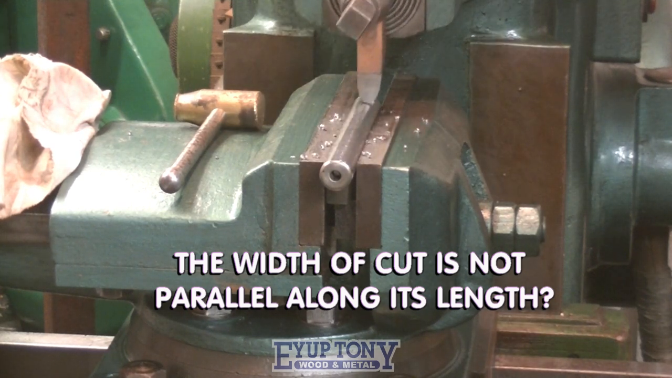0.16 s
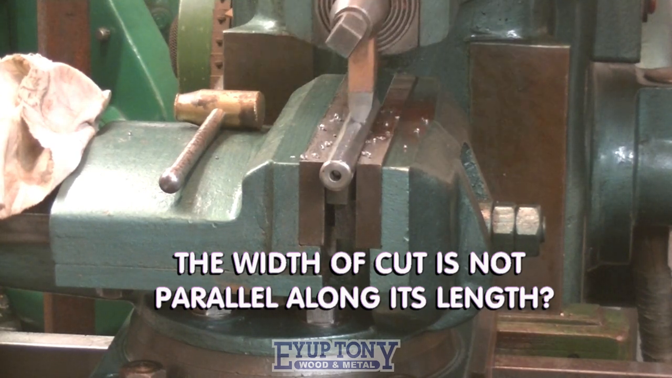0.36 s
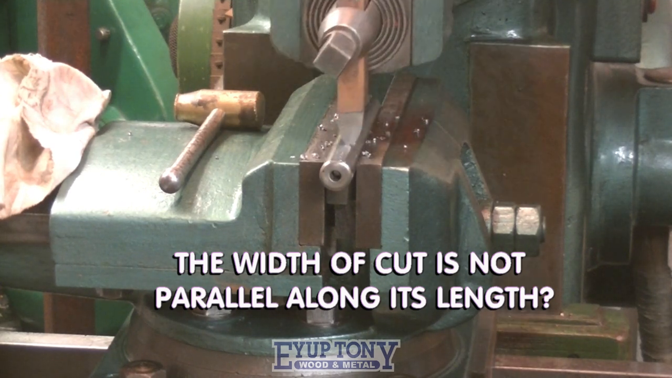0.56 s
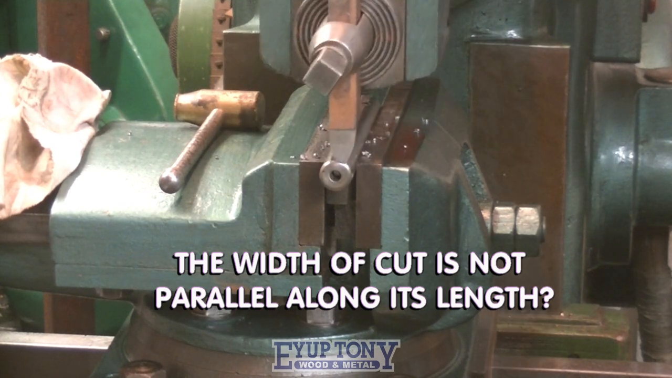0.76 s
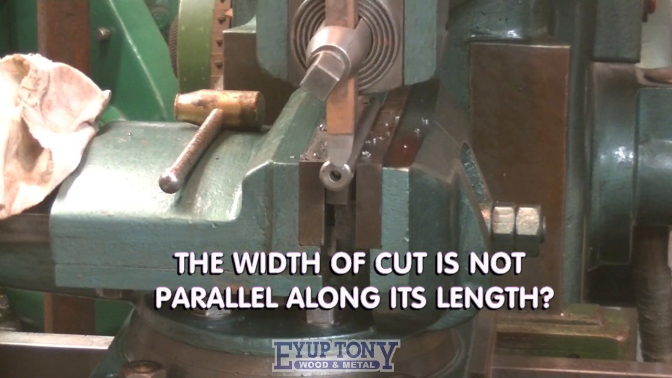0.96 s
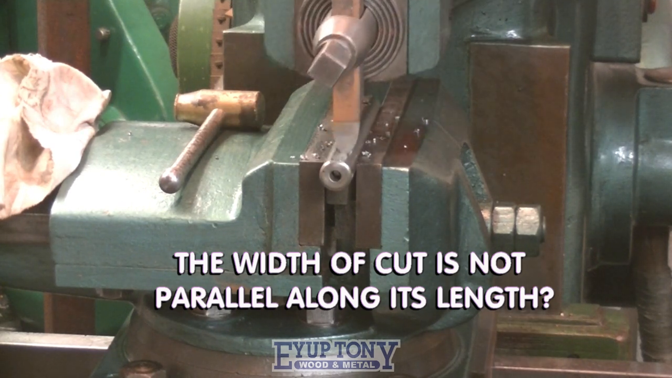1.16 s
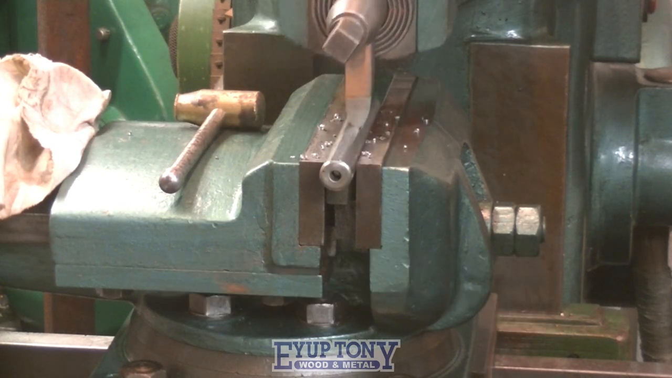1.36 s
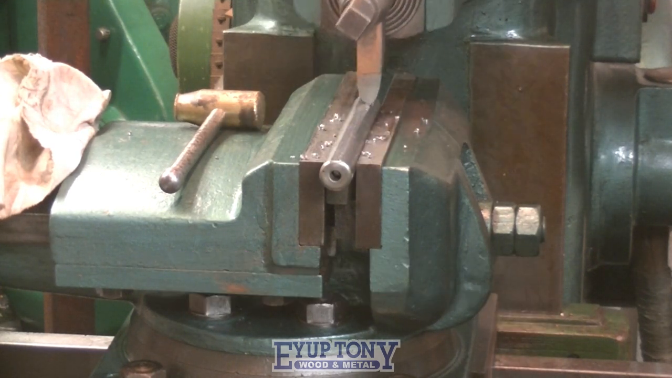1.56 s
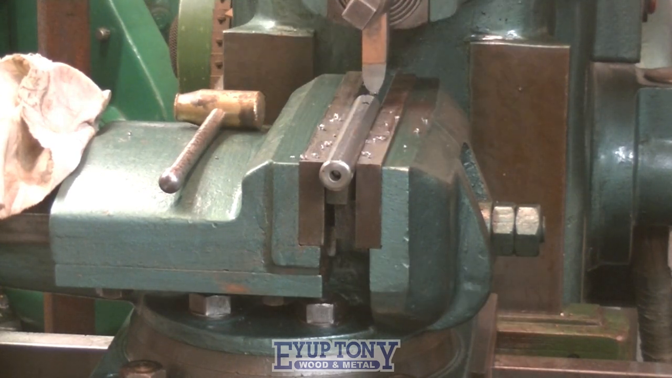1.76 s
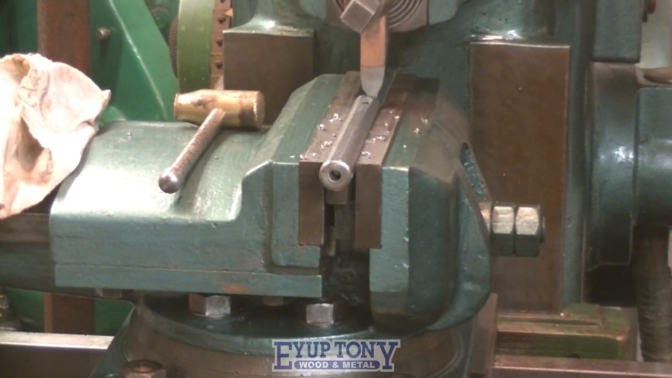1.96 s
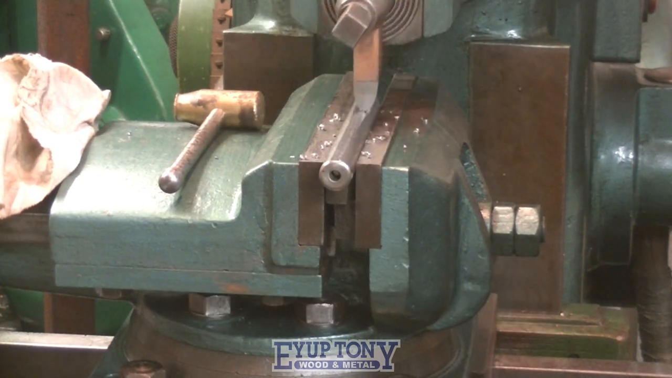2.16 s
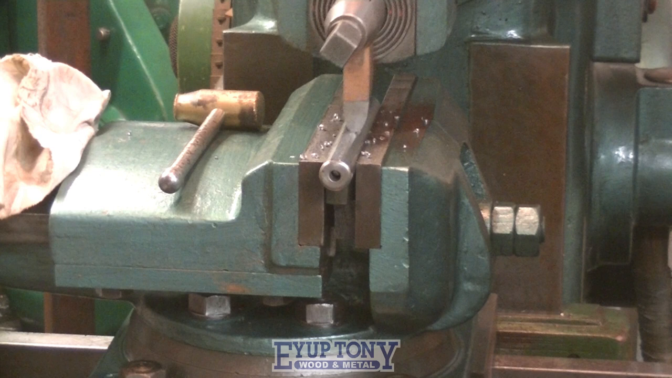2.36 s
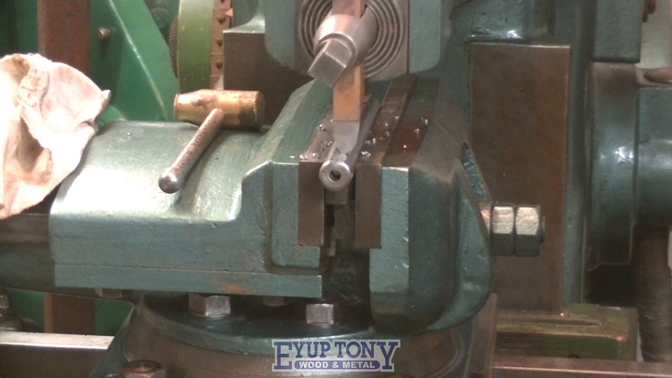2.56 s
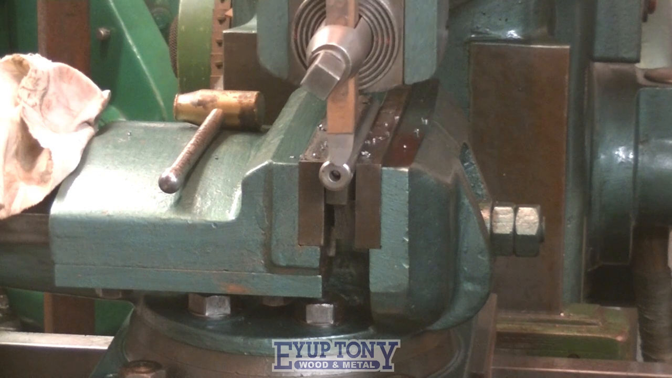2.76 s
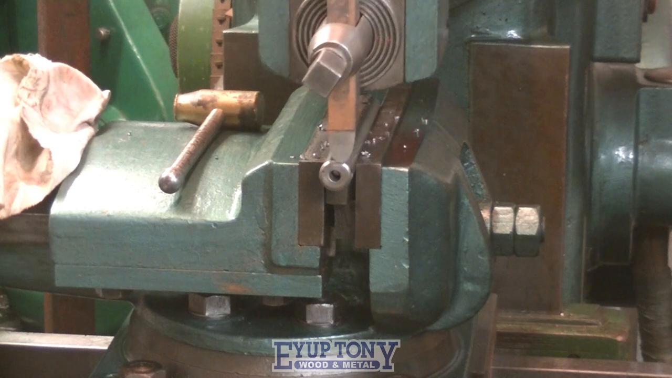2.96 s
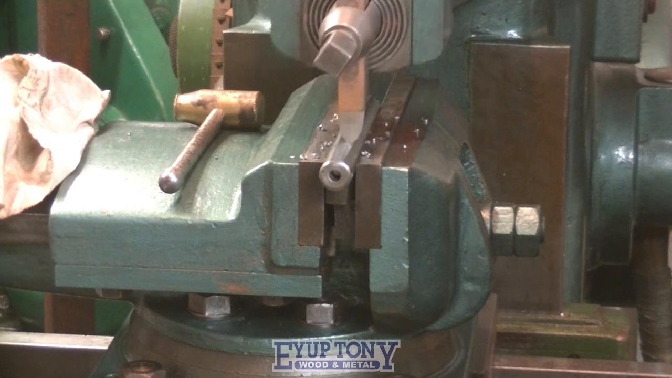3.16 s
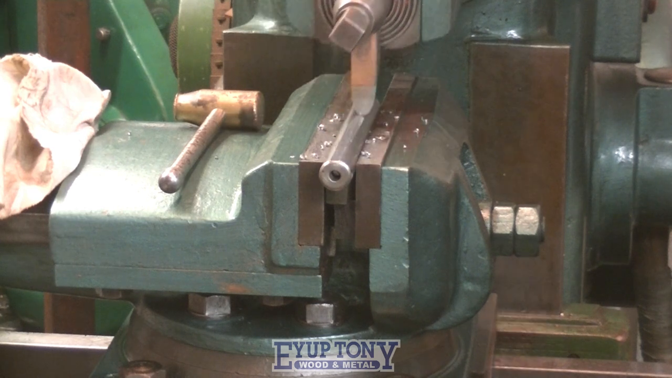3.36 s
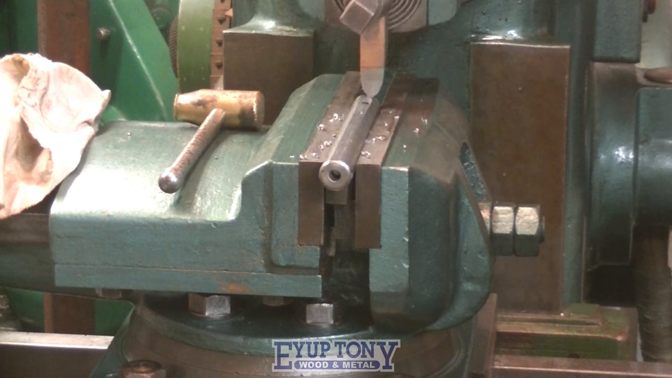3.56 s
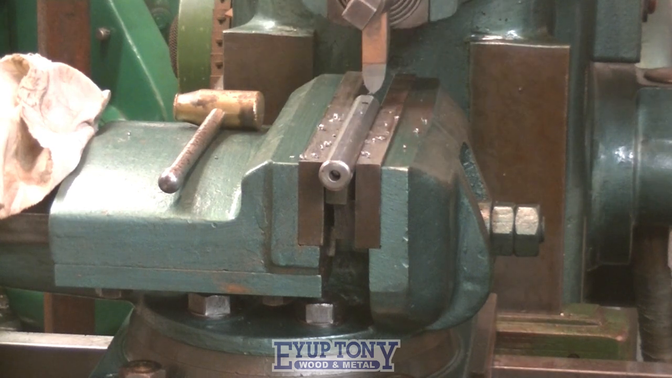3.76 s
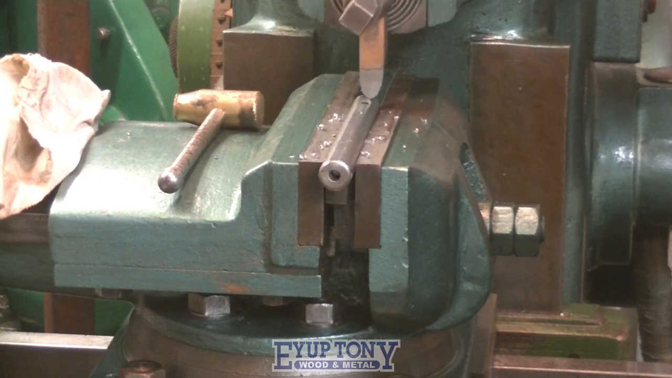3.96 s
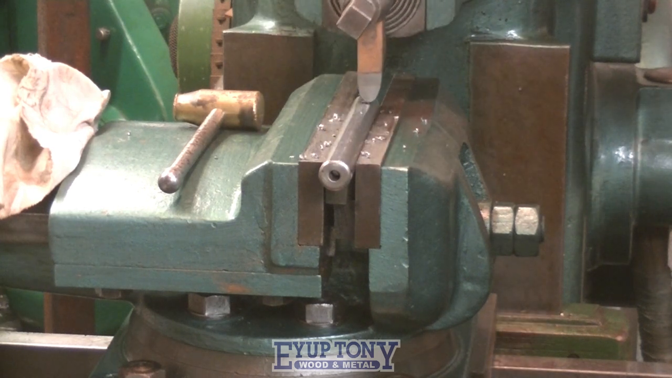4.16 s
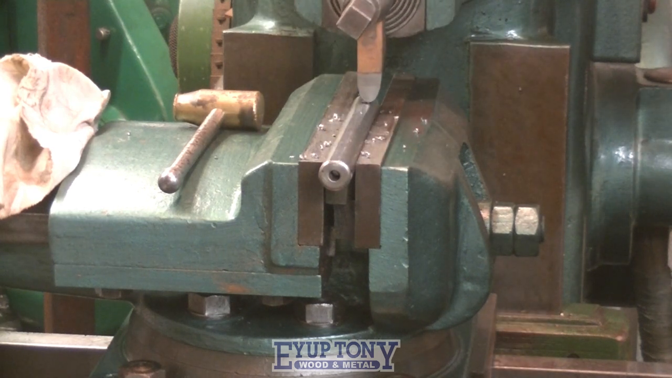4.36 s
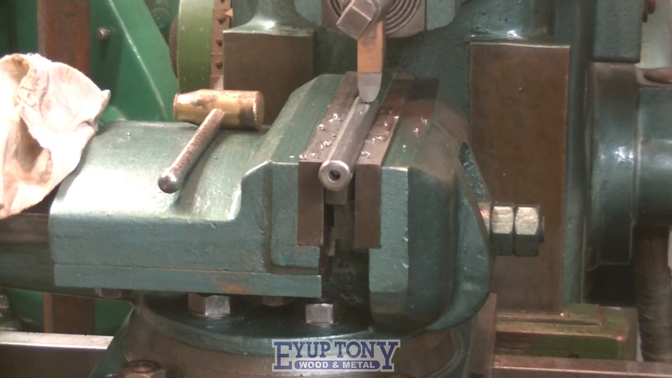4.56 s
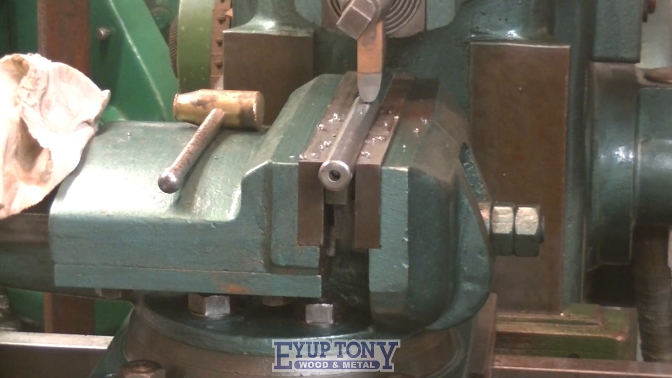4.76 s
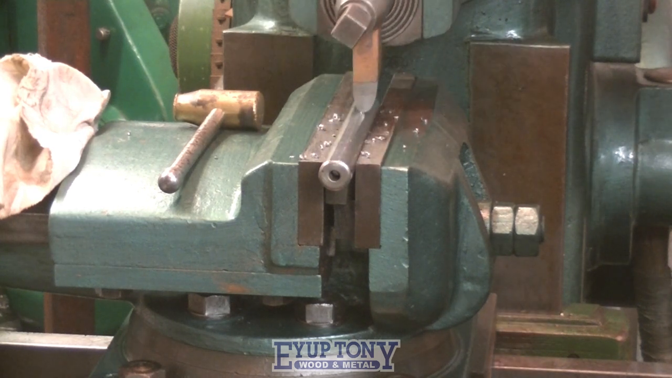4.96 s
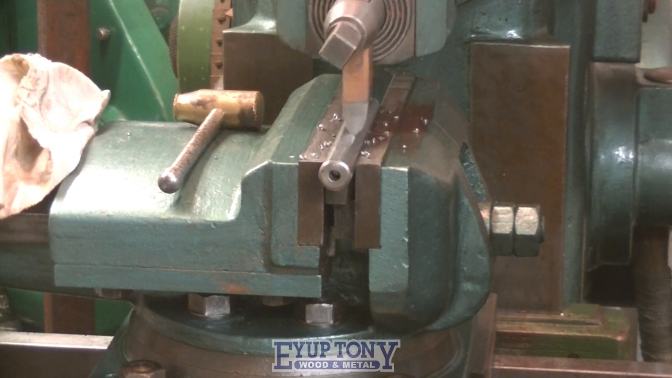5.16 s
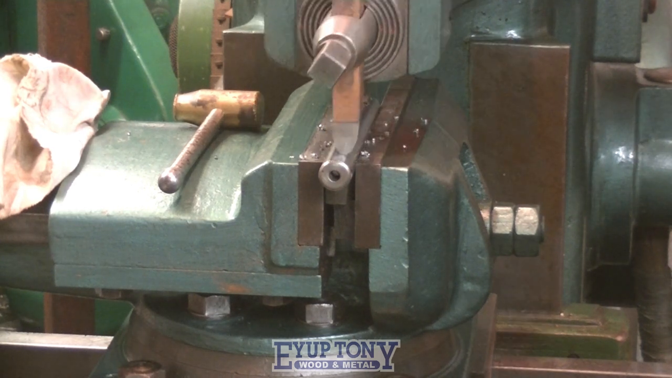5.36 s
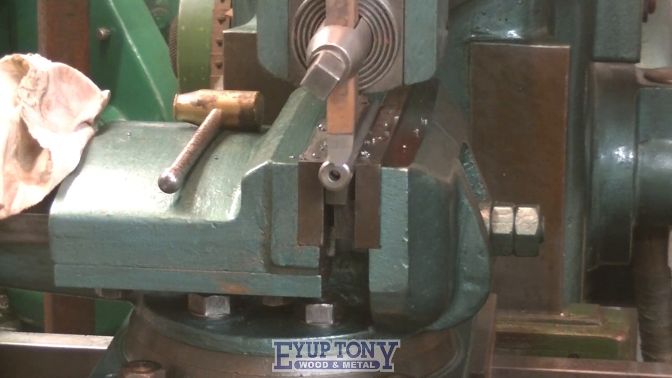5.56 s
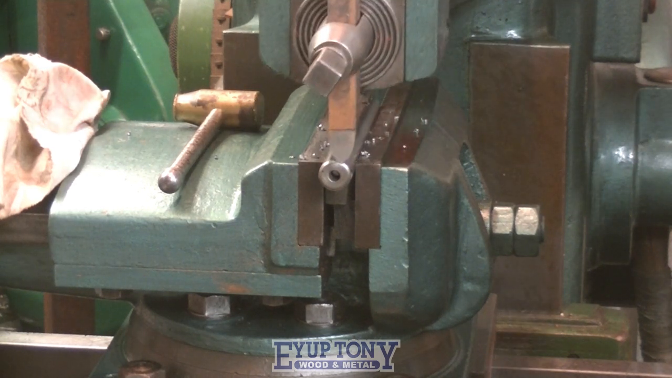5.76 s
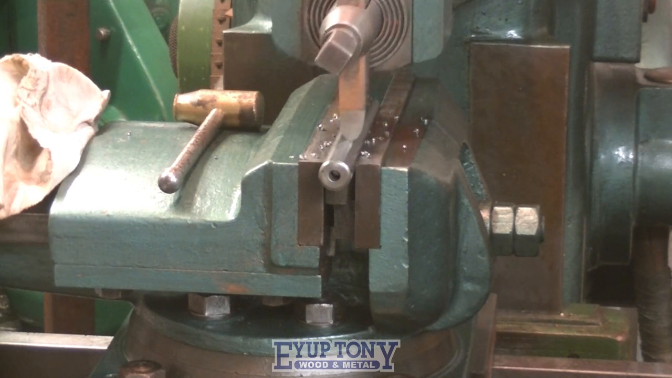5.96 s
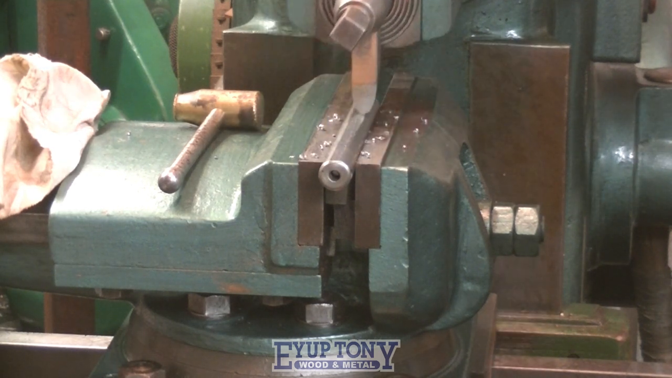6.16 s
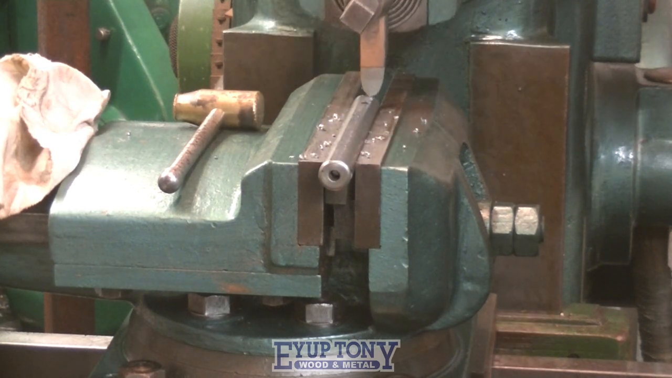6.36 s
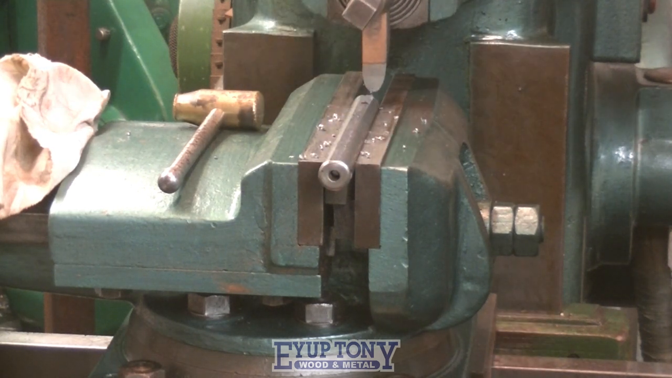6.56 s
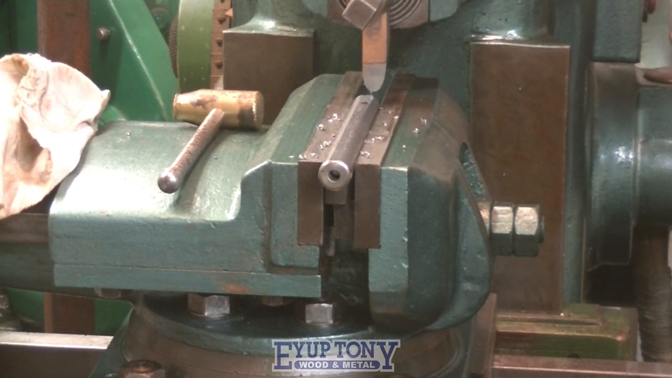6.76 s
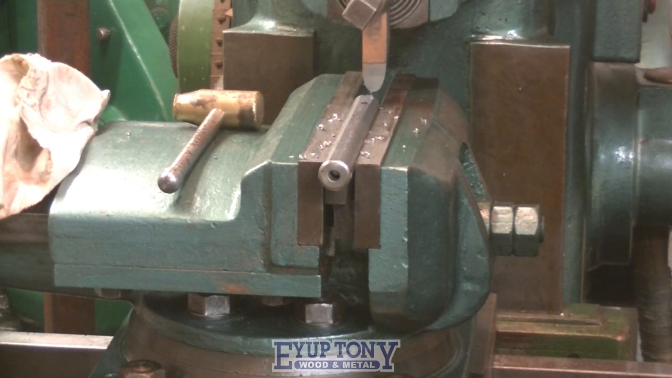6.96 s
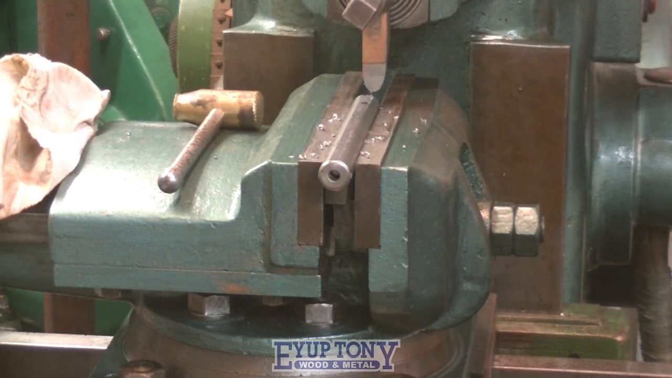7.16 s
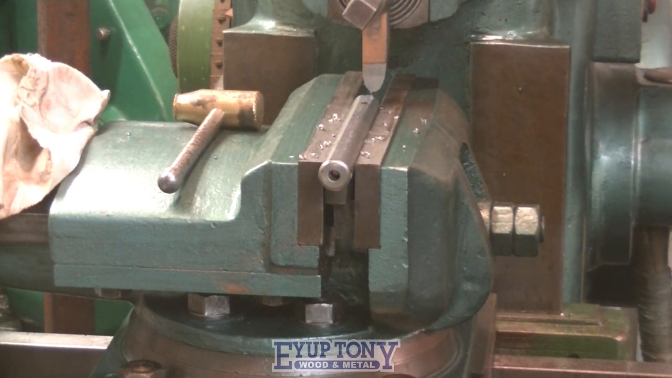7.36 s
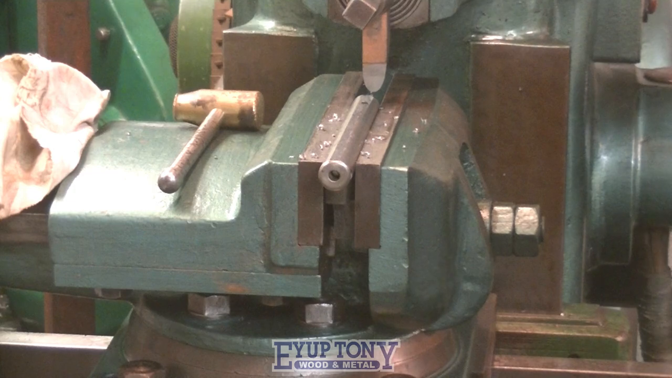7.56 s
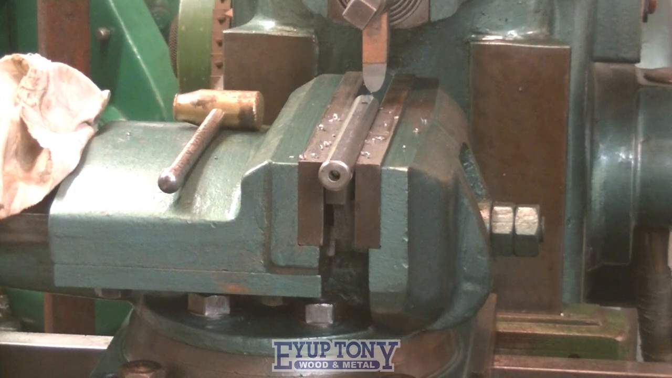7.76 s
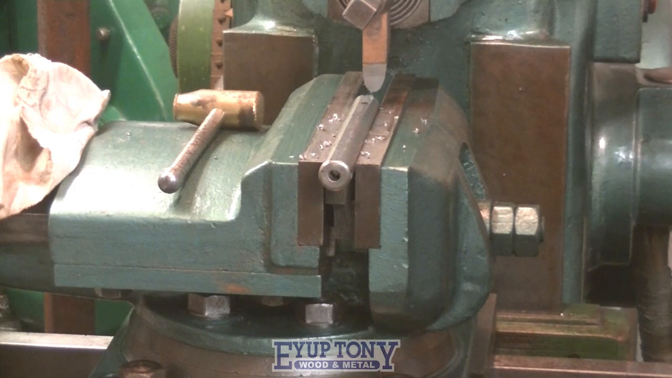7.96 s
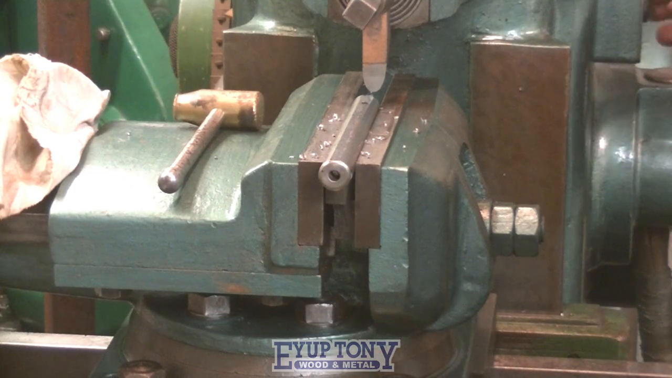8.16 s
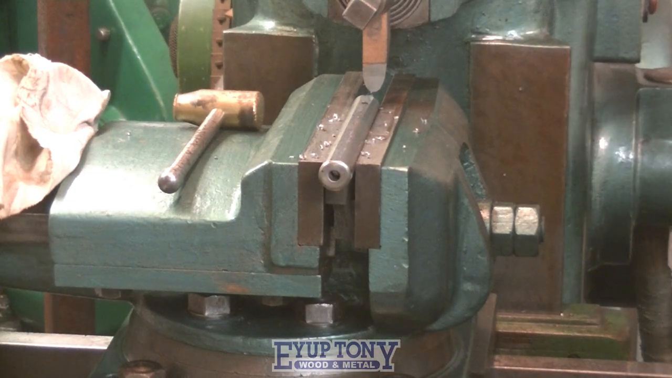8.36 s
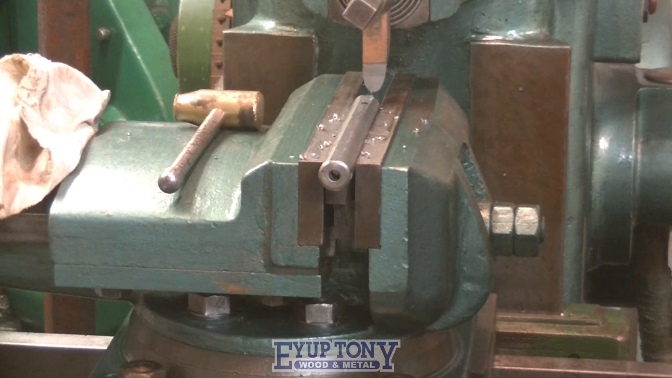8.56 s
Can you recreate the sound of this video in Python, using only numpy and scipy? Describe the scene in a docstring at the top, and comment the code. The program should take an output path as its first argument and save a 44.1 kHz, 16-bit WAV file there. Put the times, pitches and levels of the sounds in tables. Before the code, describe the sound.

Rough, grinding gear noise fills a close stereo pickup in a small, short-ringing workshop. Thin shaft chirps flutter over it and the tool box snaps sharply about every two seconds. The gears knock to a halt, the motor whirrs and hums, then one more stroke growls and snaps. After more dull clunks only the motor remains, until a switch clacks and the hum vanishes at once.

```python
"""Gears growl first, close to the microphone pair: a metal shaper strokes over steel in a small workshop.
The growl, teeth knocking in an iron casting, swells with each stroke; a shaft squeals in short chirps once a
turn, and the tool box snaps as noise bursts ringing through steel. The drive is let out, taken up for one more
stroke and let out again. The motor, filtered noise for the whirr and sines for the hum, runs on alone until
it is switched off with a clack: the hum goes at once, the whirr sinks slowly."""
import sys
import numpy as np
from scipy import signal
from scipy.fft import rfft, irfft, next_fast_len
from scipy.io import wavfile
from scipy.ndimage import map_coordinates

SR = 44100
rng = np.random.default_rng(int(sys.argv[2]) if len(sys.argv) > 2 else 0)


def master_out(mix):
    """Clip the mix to full scale and print it as 16-bit PCM to the path in sys.argv[1]."""
    frames = np.transpose(np.atleast_2d(mix))
    ceiling = np.clip(frames, -1, 1)
    pcm = np.round(ceiling * 32767).astype(np.int16)
    wavfile.write(sys.argv[1], SR, pcm)


N = 378819
TIME = np.arange(N) / SR
LEAN_LEFT = [[1.], [-1.]]  # dB for left and right: a source a little to the left
POWER_OFF_S = 8.12


def amp(db):
    """Decibels to gain."""
    return 10 ** (np.asarray(db) / 20)


def evened(x):
    """Scales to rms 1."""
    return x / np.sqrt(np.mean(x ** 2) + 1e-20)


def unit_energy(x):
    """Scales to a sum of squares of 1."""
    return x / np.linalg.norm(x)


def read(points, hz):
    """Reads a spectrum on a log-frequency axis."""
    f, value = np.transpose(points)
    return np.interp(np.log(hz + 1), np.log(f + 1), value)


def add(mix, s, sound):
    """Mixes a sound in at a time."""
    part = mix[..., max(round(s * SR), 0):][..., :sound.shape[-1]]
    part += sound[..., :part.shape[-1]]


def since(s):
    """Seconds since a moment, zero before it."""
    return np.maximum(TIME - s, 0)


def gate(start_s, end_s, edge_s):
    """Opens from the start and is shut by the end, with sloping edges."""
    return np.clip(np.minimum(TIME - start_s, end_s - TIME) / edge_s, 0, 1)


def drift(per_s, count=600):
    """Smooth random wandering of rms 1, through so many random points a second."""
    points = rng.standard_normal(count)
    slow = evened(map_coordinates(points, [TIME[::64] * per_s], mode="wrap"))
    return slow.repeat(64)[:N]


def band(x, lo_hz, hi_hz, order=2):
    """Band-pass."""
    edges = [lo_hz, min(hi_hz, SR / 2 - 1)]
    return signal.sosfilt(signal.butter(order, edges, "band", fs=SR, output="sos"), x)


def smooth_pass(x, hz, side):
    """Low-pass or high-pass without delay."""
    return signal.sosfiltfilt(signal.butter(2, hz, side, fs=SR, output="sos"), x)


def singing(hz, width_hz):
    """A narrow, rubbed resonance: band-passed noise of rms 1."""
    return evened(band(rng.standard_normal(N), hz - width_hz / 2, hz + width_hz / 2))


def burst(length_s, size=6000):
    """A contact of unit energy: fine chatter that dies away."""
    return unit_energy(rng.standard_normal(size) * np.exp(-TIME[:size] / length_s))


def body(x, colour, resonances=(), size=8192):
    """Causal filter of unit energy: a broad colour with resonances standing on it."""
    hz = abs(np.fft.fftfreq(size, 1 / SR))
    peaks_db = sum(g / (1 + (2 * (hz - f) / w) ** 2) for f, w, g in resonances)
    log_gain = np.log(amp(read(colour, hz) + peaks_db))
    # minimum phase: the ring starts at once and only dies away
    ring = np.fft.ifft(np.exp(np.conj(signal.hilbert(log_gain)))).real[:size // 2]
    return signal.oaconvolve(np.atleast_2d(x), unit_energy(ring)[None], axes=1)[:, :x.shape[-1]]


def struck(blows, modes, rise_s=.002, size=16000):
    """Blows (time [s], level [dB]) set the decaying sine modes of one object ringing."""
    t, out = TIME[:size], np.zeros(N)
    ring = sum(amp(db - 60 * t / t60) * np.sin(2 * np.pi * (hz * t + rng.random()))
               for hz, db, t60 in modes)
    for s, db in blows:
        add(out, s, amp(db) * ring * (1 - np.exp(-t / rise_s)))
    return out


# likeness of the two microphones: (frequency [Hz], left-right correlation [-1 to 1])
PAIR_LIKENESS = [(40, 0.3), (120, 0.42), (300, 0.97), (600, 0.96), (1200, .95), (2200, 0.9), (4000, 0.62),
                 (8000, 0.3), (14000, 0.33)]
# lean of the microphone pair: (frequency [Hz], left minus right [dB])
PAIR_BALANCE = [(60, -1.5), (250, 1.5), (500, 3.5), (1000, 2.5), (2000, 1.5), (4000, -0.1), (12000, 2.5)]


def ports(pair):
    """Two unrelated signals become a microphone pair, its likeness and balance varying with pitch."""
    size = next_fast_len(pair.shape[1])
    (a, b), hz = rfft(pair, size), np.fft.rfftfreq(size, 1 / SR)
    same = np.clip(read(PAIR_LIKENESS, hz), -1, 1)
    mid = a * np.sqrt((1 + same) / 2)
    side = b * np.sqrt((1 - same) / 2)
    lean = amp(read(PAIR_BALANCE, hz) / 2)
    return irfft(np.array([(mid + side) * lean, (mid - side) / lean]), size)[:, :pair.shape[1]]


# how long the workshop rings: (frequency [Hz], 60 dB decay time [s])
ROOM_DECAY = [(100, 0.1), (1000, 0.22), (4000, 0.22), (8000, 0.19), (15000, 0.12)]


def workshop(x, direct_db, wet_db, gap_s=.002):
    """Direct sound, then dense reflections from close walls and machines, each pitch dying at its own rate."""
    size = SR // 2
    taps = rng.standard_normal((2, size)) * (rng.random((2, size)) < 5000 / SR)  # 5000 a second
    taps *= TIME[:size] > gap_s
    hz, t, z = signal.stft(taps, SR, nperseg=256)
    decay = amp(-60 * t / read(ROOM_DECAY, hz)[:, None])
    tail = ports(signal.istft(z * decay, SR, nperseg=256)[1])
    tail = unit_energy(tail) * np.sqrt(2)  # unit energy per microphone
    wet = signal.oaconvolve(x[None], tail, axes=1)[:, :N]
    return amp(direct_db) * x + amp(wet_db) * wet


# colour of belt and bearing whirr: (frequency [Hz], relative density [dB per Hz])
WHIRR_COLOUR = [(30, -33), (60, -30.5), (135, -16), (180, -12), (235, -11.5), (300, -3.5), (480, 0),
                (900, 0), (1500, -3), (2500, -4.5), (3500, -11.5), (5500, -17.5), (9000, -26.5),
                (15000, -42)]
# resonances of the belt guard and pulleys: (frequency [Hz], width [Hz], height [dB])
GUARD_RESONANCES = [(190, 30, 5.5), (364, 36, 6.5), (740, 120, -2), (920, 120, 2), (1750, 60, 2),
                    (2425, 46, 5), (2924, 98, 7.5)]
LULL_S, LULL_WIDTH_S, LULL_WHIRR_DB = 7.24, .14, -4.8  # the idling motor goes briefly quieter
COAST_FALL_DB_PER_S = 8  # after the current is cut
# without current the motor's magnetic rumble, the low part of the whirr, drops
MAGNETIC_RUMBLE_DB, MAGNETIC_RUMBLE_S, MAGNETIC_RUMBLE_BELOW_HZ = -3.8, .1, 950
# the bearings sing on steadily: (frequency [Hz], width [Hz], level [dB])
BEARING_TONES = [(430, 19, -77), (1123, 160, -65.5), (1917, 150, -76.5), (2370, 400, -74.5),
                 (4260, 570, -74)]


def motor_whirr(whirr_db=-57.9, flutter_db=1.1):
    """Noise of belt, bearings and magnetic rumble, coloured by the guard, sinks once the current is cut."""
    off_s, lull = since(POWER_OFF_S), np.exp(-((TIME - LULL_S) / LULL_WIDTH_S) ** 2)
    whirr = evened(body(rng.standard_normal((2, N)), WHIRR_COLOUR, GUARD_RESONANCES))
    whirr = whirr * amp(whirr_db + LULL_WHIRR_DB * lull - COAST_FALL_DB_PER_S * off_s)
    rumble = smooth_pass(whirr, MAGNETIC_RUMBLE_BELOW_HZ, "low")
    whirr = whirr + rumble * (amp(MAGNETIC_RUMBLE_DB * np.minimum(off_s / MAGNETIC_RUMBLE_S, 1)) - 1)
    bearings = sum(amp(db) * np.array([singing(hz, width), singing(hz, width)])
                   for hz, width, db in BEARING_TONES)
    return ports(whirr + bearings) * amp(flutter_db * drift(25))


# motor hum: magnetic tones, with rotor tones near 377, 425 and 468 Hz: (frequency [Hz], level [dB])
HUM_LINES = [(299.5, -80), (376.8, -73), (424.5, -76), (468.3, -73), (549.1, -76), (598.5, -69.5),
             (699.8, -71), (796.7, -74.5), (1001, -74), (1098, -72)]
WHINE_HZ, DRONE_HZ = 899.2, 500
# slot whine: (time [s], level [dB])
WHINE_CURVE = [(4.2, -60.5), (6.9, -59.8), (7.12, -62.5), (7.27, -73), (7.45, -62), (8.1, -61.8)]
# drone, loudest just before the current is cut: (time [s], level [dB])
DRONE_CURVE = [(4.4, -70), (6.75, -69.5), (7.05, -66.5), (7.3, -66), (7.5, -63.8), (8.1, -62.5)]
MAINS_HZ, MAINS_DB = 100, -91  # a faint tone that stays to the end
HUM_FALL_DB_PER_S = 130  # after the current is cut


def motor_hum():
    """Magnetic pull and the turning rotor hum in slightly wavering tones, which collapse with the current."""
    def line(hz, db):
        level = np.sqrt(2) * amp(db + 1.1 * drift(12) + 1.5 * drift(2.5))
        return level * np.sin(2 * np.pi * hz * TIME + .25 * drift(14))
    hum = sum(line(hz, db) for hz, db in HUM_LINES)
    whine = line(WHINE_HZ, np.interp(TIME, *np.transpose(WHINE_CURVE)))
    drone = line(DRONE_HZ, np.interp(TIME, *np.transpose(DRONE_CURVE)))
    fall = amp(-HUM_FALL_DB_PER_S * since(POWER_OFF_S))
    return (hum + whine + drone) * fall + line(MAINS_HZ, MAINS_DB)


CLUTCH_HZ, CLUTCH_RISE_S, CLUTCH_FADE_DB_PER_S = 2577, .12, 10


def clutch(width_hz=70, flutter_db=2.):
    """The freed plate rubs and rings, fading, until it is taken up again or the current is cut."""
    ends = [run[0] for run in RAM_RUNS[1:]] + [POWER_OFF_S]
    level = np.zeros(N)
    for (_, _, still_s, _, _, db), end_s in zip(RAM_RUNS, ends):
        free = gate(still_s, end_s + CLUTCH_RISE_S, CLUTCH_RISE_S)
        level += free * amp(db - CLUTCH_FADE_DB_PER_S * since(still_s))
    return singing(CLUTCH_HZ, width_hz) * level * amp(flutter_db * drift(16))


# small chips landing on the steel: (time [s], level [dB])
CHIP_PINGS = [(1.482, -34), (3.3855, -35)]


def chips(lo_hz=11500, hi_hz=15600, length_s=.003):
    """A flying chip lands with a tiny, glassy tick: a short burst in the top treble."""
    out = np.zeros(N)
    for s, db in CHIP_PINGS:
        add(out, s, amp(db) * burst(length_s))
    return band(out, lo_hz, hi_hz)


# slack parts: (time [s], relative level [dB], length [s], centre [Hz], width [octaves])
SLACK_KNOCKS = [(3.695, -20.5, .01, 2620, .55), (3.797, -10.5, .04, 1160, .16),
                (3.825, -21, .015, 1650, .6), (3.879, -12.5, .014, 1800, .7), (3.958, -23, .014, 420, .8),
                (6.428, -15, .025, 1300, 1.2), (6.442, -20, .012, 390, .8), (6.467, -21.5, .016, 3580, .7),
                (6.539, -16, .0083, 1100, 1.6), (6.605, -21, .018, 1700, 1.2),
                (6.75, -27.5, .035, 1700, .6)]


def knocks():
    """Slack parts thud dully, each a noise burst in its own range."""
    out = np.zeros(N)
    for s, db, length_s, hz, octaves in SLACK_KNOCKS:
        half_width = 2 ** (octaves / 2)
        thud = band(burst(length_s), hz / half_width, hz * half_width, order=4)
        add(out, s, amp(db) * unit_energy(thud))
    return out


# colour of the switch contacts: (frequency [Hz], relative level [dB])
CONTACT_COLOUR = [(100, -22), (300, -6), (550, 5.5), (1100, -4), (1700, -1), (2400, 0), (2950, 0),
                  (3450, 3.5), (4300, -9), (5400, -3.5), (8000, -3), (10000, -13), (12500, -11),
                  (16000, -22)]
# the stop switch, button, trip, contactor falling open:
# (time [s], relative click level [dB], contact time [s], relative box thud [dB])
SWITCH_CONTACTS = [(8.091, -23, .0089, -40), (8.1228, -18, .002, -26), (8.1258, -6.8, .0015, -15),
                   (8.132, -13, .004, -24), (8.14, -19, .0073, -30), (8.1535, -21, .005, -22),
                   (8.164, -23, .0027, 0)]


def switch(level_db=-7.7):
    """The contacts of the stop switch click in a quick rattle."""
    clicks = np.zeros(N)
    for s, click_db, contact_s, _ in SWITCH_CONTACTS:
        add(clicks, s, amp(click_db) * burst(contact_s))
    return amp(level_db) * body(clicks, CONTACT_COLOUR)[0]


# what the hollow switch box rings with: (frequency [Hz], relative level [dB], 60 dB decay time [s])
BOX_RING = [(180, -62, .2), (280, -52, .08), (345, -46.5, .32), (450, -49, .06), (560, -45, .1),
            (755, -43, .12), (825, -43, .1), (1155, -53, .1), (1700, -56, .07), (2005, -52, .14),
            (2350, -56, .1)]


def switch_box():
    """The hollow box booms in its own modes under every contact of the switch."""
    return struck([(s, db) for s, _, _, db in SWITCH_CONTACTS], BOX_RING)


# the gears clunk across their backlash as the load comes off: (time [s], relative level [dB])
GEAR_CLUNKS = [(3.812, -3), (3.836, -1), (3.947, -3), (3.975, -9), (4.012, -10), (4.063, -11), (4.089, -4),
               (6.472, -6), (6.539, 3.5), (6.565, -8), (6.601, -5), (6.631, -7), (6.665, -11)]
# what a gear wheel rings with: (frequency [Hz], relative level [dB], 60 dB decay time [s])
WHEEL_RING = [(390, -51, .1), (505, -50, .09), (590, -50, .09), (680, -44, .08), (712, -41, .12),
              (940, -46, .06), (1080, -44, .09), (1430, -50, .05), (2220, -54, .08)]


def clunks():
    """Teeth fall across their backlash and set the gear wheels ringing."""
    return struck(GEAR_CLUNKS, WHEEL_RING)


# the tool edge catching on the steel: (time [s], relative level [dB], contact time [s])
EDGE_CATCHES = [(3.7155, -15, .002), (3.719, 0, .0035), (3.7245, -2.5, .004), (6.36, -26, .012),
                (6.385, -24, .02)]
# colour of the tool: (frequency [Hz], relative level [dB])
EDGE_COLOUR = [(100, -43), (1200, -25), (2500, -3.5), (4000, 0.5), (9500, -5), (10600, -11.5),
               (15500, -11.5)]
# resonances of the tool in its post: (frequency [Hz], width [Hz], height [dB])
TOOL_RESONANCES = [(2570, 180, 9), (3150, 250, 3), (4830, 300, 8), (7100, 330, 14), (8130, 180, 6),
                   (8680, 200, 4), (12000, 700, 3), (13500, 800, 8)]


def catches(level_db=-8.2):
    """The edge chatters briefly and sets the tool ringing."""
    out = np.zeros(N)
    for s, db, contact_s in EDGE_CATCHES:
        add(out, s, amp(db + level_db) * burst(contact_s))
    return body(out, EDGE_COLOUR, TOOL_RESONANCES)[0]


# the clapper box snaps as the ram turns back, and ticks:
# (time [s], relative level [dB], contact time [s], relative low push [dB])
CLAPPER_SNAPS = [(1.1325, -7.2, 0.0012, -21), (3.0575, -7.8, 0.00039, -16), (5.842, -8.8, 0.0018, -15)]
# colour of the snaps: (frequency [Hz], relative level [dB])
CLAPPER_COLOUR = [(100, -24), (500, -11), (1500, -2), (2900, 4), (4400, -1.5), (6000, -3), (8900, -3.3),
                  (10400, -19), (12000, -14.5), (16000, -15.5)]
# resonances of the clapper box: (frequency [Hz], width [Hz], height [dB])
CLAPPER_RESONANCES = [(3800, 600, 4), (5320, 520, 6.5), (7100, 600, 3), (8500, 500, 3), (11700, 700, 2),
                      (14300, 900, 2)]
REBOUND_S, REBOUND_DB = .0042, -9  # the clapper bounces once
CHATTER_S, CHATTER_DB = .02, -7  # and rattles on in its seat


def snaps(level_db=-6.5, push_hz=160, frame_db=-12.5):
    """Hard steel contacts: one sharp tick, a bounce and a dying rattle, and a low push through the frame."""
    pushes, contacts = np.zeros(N), np.zeros(N)
    tick = signal.unit_impulse(6000)
    push = unit_energy(band(tick, 25, push_hz, order=1))
    for s, db, contact_s, push_db in CLAPPER_SNAPS:
        hit = 1.35 * tick + .55 * burst(contact_s)
        rebound = amp(REBOUND_DB) * burst(contact_s) + amp(CHATTER_DB) * burst(CHATTER_S)
        add(contacts, s, amp(db) * hit)
        add(contacts, s + REBOUND_S, amp(db) * rebound)
        add(pushes, s, amp(db + push_db + frame_db) * push)
    return amp(level_db) * (pushes + body(contacts, CLAPPER_COLOUR, CLAPPER_RESONANCES)[0])


SHAFT_TURNS_PER_S, DRY_SPOT_S, DRY_UNTIL_S = 14.435, .031, 3.68  # first pass of the dry spot, and its end
CHIRP_DB, CHIRP_SPREAD_DB = -73, 1.3  # the faint chirp of every turn between bouts
CHIRP_S, CHIRP_RISE_S, SLIP_S = .018, .002, .0062  # a chirp stutters in about three slips
RUB_EDGE_S = .04
# bouts of loud chirping: (start [s], end [s], level [dB])
CHIRP_BOUTS = [(.07, .13, -64), (.41, .62, -66), (.9, .97, -60.5), (1.04, 1.1, -60.5), (1.31, 1.66, -60.5),
               (1.8, 1.86, -56), (1.86, 2.14, -59), (2.36, 2.76, -67), (2.49, 2.63, -58.5),
               (2.84, 3.18, -64.5), (3.39, 3.66, -64), (3.46, 3.53, -58.5)]
# the same shaft rubbing without a break: (start [s], end [s], relative level [dB])
RUB_BOUTS = [(-.1, .85, -73), (.85, 3.85, -74), (4.62, 4.69, -75), (4.92, 5.32, -71), (5.99, 6.46, -69)]


def shaft(hz=7390, waver_hz=130, slip_depth=.45, rasp=.35, rasp_width_hz=650,
          rub_hz=7230, rub_width_hz=380, rub_db=-2.7):
    """A dry spot stutters on one thin pitch as it comes round, over a faint sung rub."""
    t = np.arange(0, CHIRP_S, 1 / SR)
    slips = 1 + slip_depth * np.cos(2 * np.pi * (t - CHIRP_RISE_S) / SLIP_S)
    swell = np.minimum(t / CHIRP_RISE_S, 1) * np.sqrt(1 - t / CHIRP_S) * slips
    pitch = hz + waver_hz * drift(500, count=5000)
    squeal = evened(np.sin(2 * np.pi * np.cumsum(pitch) / SR) + rasp * singing(hz, rasp_width_hz))
    chirps = np.zeros(N)
    turns = np.arange(DRY_SPOT_S, DRY_UNTIL_S, 1 / SHAFT_TURNS_PER_S)
    for s, chance in zip(turns, rng.standard_normal(len(turns))):
        loudest_db = max([CHIRP_DB] + [db for start, end, db in CHIRP_BOUTS if start < s < end])
        add(chirps, s - CHIRP_RISE_S, amp(loudest_db + CHIRP_SPREAD_DB * chance) * swell)
    once_a_turn = np.cos(2 * np.pi * SHAFT_TURNS_PER_S * (TIME - DRY_SPOT_S - SLIP_S))
    rub = singing(rub_hz, rub_width_hz) * (1 + .4 * once_a_turn * (TIME < DRY_UNTIL_S))
    pressure = sum(amp(db) * gate(start, end, RUB_EDGE_S) for start, end, db in RUB_BOUTS)
    return chirps * squeal + rub * pressure * amp(rub_db + 2.2 * drift(70))


# runs of the ram: (clutch in [s], clutch out [s], standstill [s], a moment fully forward [s],
# gear level before effort [dB], starting ring of the freed clutch [dB])
RAM_RUNS = [(-1, 3.85, 4.085, 0.875, -41.1, -69.5), (4.845, 6.56, 6.64, 5.635, -40.7, -65.5)]
# colour of the teeth: (frequency [Hz], relative density [dB per Hz])
TOOTH_COLOUR = [(50, -36.5), (130, -33.5), (220, -15), (270, -4.0), (340, -4), (500, 1.2), (1000, -0.74),
                (2000, 0.0), (2900, -6), (4200, -22), (6000, -28.4), (8800, -34.5), (10500, -54.5),
                (15000, -51)]
# resonances of the iron body: (frequency [Hz], width [Hz], height [dB])
CASTING_RESONANCES = [(162, 18, 4), (348, 19, 7.0), (389, 50, 12.0), (546, 14, 2.9), (597, 14, 3.5),
                      (648, 25, 6.9), (687, 40, 12.0), (754, 39, 9.1), (809, 24, 8.9), (876, 53, 7.3),
                      (947, 52, 8.5), (1067, 83, 7.9), (1177, 66, 8.5), (1282, 65, 8.2), (1422, 55, 7.5),
                      (1729, 116, 4.0), (1838, 54, 4.2), (1944, 43, 5.8), (2208, 30, 5.5), (2405, 70, -3.5),
                      (2590, 25, 8.2), (2852, 48, 2.5), (5223, 295, 2.0)]
STROKE_S = 1.925
# every stroke, quick return then slow cut: (time after fully forward [s], effort [dB],
# brightness [dB], weight of the low growl [dB])
STROKE_SHAPE = [(0, -3.3, -1.2, -1), (.24, -1.3, -.5, -.5), (.45, 1.1, .8, -1.5), (.66, .9, 1.6, .5),
                (.93, -1.8, .8, .5), (1.3, 0, 1.5, -.5), (1.68, -.3, .5, -.5), (1.925, -3.3, -1.2, -1)]
# the growl surges or dips briefly: (time [s], half length [s], change [dB])
GROWL_SURGES = [(.3, .08, .8), (.58, .07, 1.6), (1.06, .025, 2.5), (1.42, .1, .6), (1.58, .05, 1.2),
                (2.36, .12, 1.0), (3.41, .08, 1.6), (3.775, .025, -2.5), (3.868, .012, -4),
                (5.53, .045, 2.5), (6.02, .04, 1.5), (6.45, .035, 2.0), (6.515, .014, -1.5),
                (6.58, .04, 1.2)]
LOAD_DB_PER_S = .05  # the gears work a little harder as a run goes on
TAKE_UP_S, JOLT_DB, JOLT_S, JOLT_DULL_DB = .09, 9, .075, -13  # the clutch bites with a dull surge
# let out, the gears sink and dull, then die away
COAST_DB, COAST_DULL_DB, SETTLE_DB_PER_S = -4.8, -12.5, 90
# the frame drones during the cut
CUT_FROM_S, CUT_LENGTH_S, CUT_HZ, CUT_WIDTH_HZ, CUT_DB = .9, .85, 163, 20, -80.5


def gears(knocks_per_s=2200, spread_db=2., slide=1.15, flutter_db=.35, weight_flutter_db=.6):
    """Teeth knock and slide inside the casting; the load of each stroke swells and brightens the growl."""
    teeth = (rng.random((2, N)) < knocks_per_s / SR) * rng.standard_normal((2, N))
    teeth *= amp(spread_db * np.minimum(rng.exponential(size=(2, N)), 2))
    contact = evened(teeth) + slide * rng.standard_normal((2, N))
    growl = evened(ports(body(contact, TOOTH_COLOUR, CASTING_RESONANCES)))
    low, high = smooth_pass(growl, 520, "low"), smooth_pass(growl, 1500, "high")
    frame = amp(CUT_DB) * singing(CUT_HZ, CUT_WIDTH_HZ)
    stroke_s, *shape = np.transpose(STROKE_SHAPE)
    out = np.zeros((2, N))
    for in_s, out_s, still_s, forward_s, level_db, _ in RAM_RUNS:
        place_s = (TIME - forward_s) % STROKE_S
        effort_db, bright_db, weight_db = (np.interp(place_s, stroke_s, column) for column in shape)
        jolt = np.exp(-since(in_s) / JOLT_S)
        coast = np.minimum(since(out_s) / (still_s - out_s), 1)
        effort_db = effort_db + LOAD_DB_PER_S * (TIME - forward_s) + JOLT_DB * jolt + COAST_DB * coast
        bright_db = bright_db + JOLT_DULL_DB * jolt + COAST_DULL_DB * coast
        weight_db = weight_db + weight_flutter_db * drift(14)
        moving = np.minimum(since(in_s) / TAKE_UP_S, 1) ** 2 * amp(-SETTLE_DB_PER_S * since(still_s))
        tone = growl + high * (amp(bright_db) - 1) + low * (amp(weight_db) - 1)
        cut_place = np.clip((place_s - CUT_FROM_S) / CUT_LENGTH_S, 0, 1)
        cutting = np.sqrt(abs(np.sin(np.pi * cut_place))) * (1 - coast)
        out += moving * (amp(level_db + effort_db) * tone + cutting * frame)
    swell_db = sum(db * np.exp(-((TIME - s) / half_s) ** 2) for s, half_s, db in GROWL_SURGES)
    return out * amp(swell_db + flutter_db * drift(30))


def scene():
    """The motor behind, small noises out in the room, shaft and heavy parts nearer, the gears in front."""
    motor = motor_whirr() + (motor_hum() + clutch()) * amp(LEAN_LEFT)
    far = workshop(catches() + knocks() + switch() + chips(), direct_db=-4, wet_db=-1)
    clapper = workshop(snaps(), direct_db=-6, wet_db=-3.5)
    near = workshop(shaft(), direct_db=-.5, wet_db=-7)
    heavy = workshop(clunks() + switch_box(), direct_db=0, wet_db=-14) * amp(LEAN_LEFT)
    return motor + far + clapper + near + heavy + gears()


def record(dry):
    """The recorder's band limit: nothing much above 15.8 kHz."""
    low_pass = signal.firwin(511, 15800, window=("kaiser", 9), fs=SR)
    return signal.oaconvolve(dry, low_pass[None], "same")


dry = scene()
out = record(dry)
master_out(out)
```